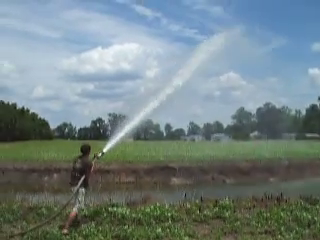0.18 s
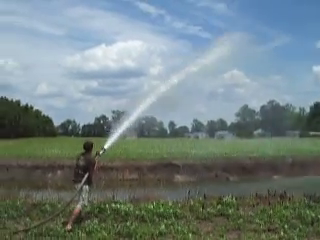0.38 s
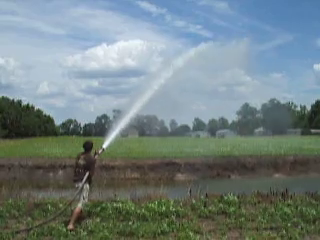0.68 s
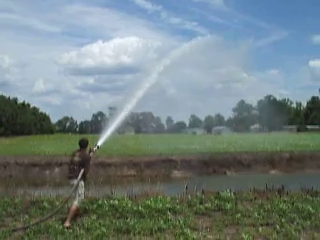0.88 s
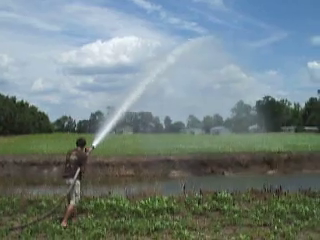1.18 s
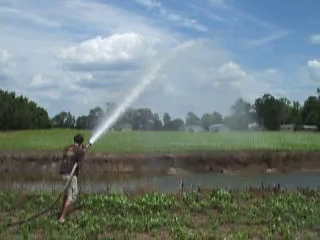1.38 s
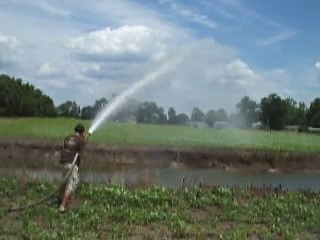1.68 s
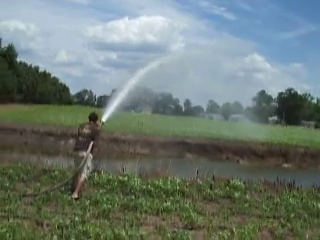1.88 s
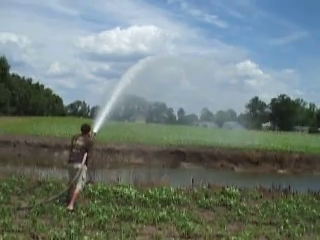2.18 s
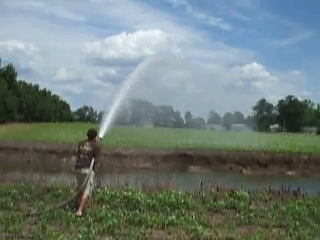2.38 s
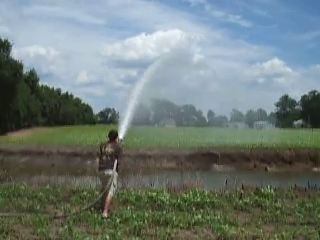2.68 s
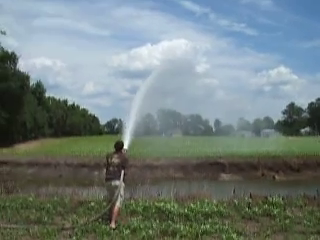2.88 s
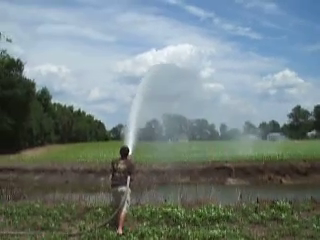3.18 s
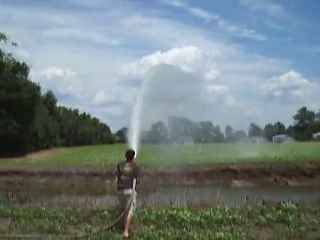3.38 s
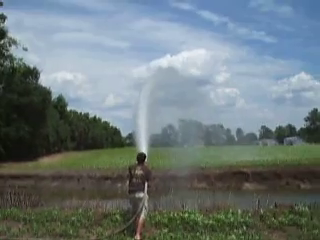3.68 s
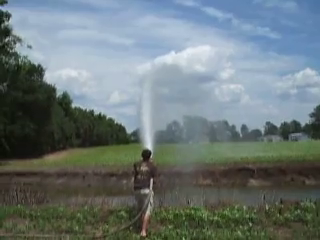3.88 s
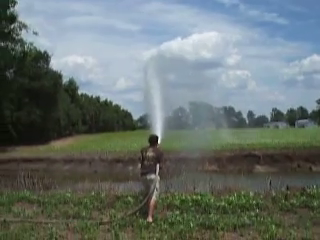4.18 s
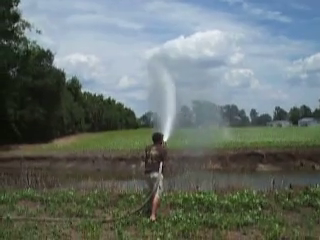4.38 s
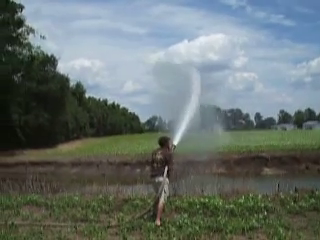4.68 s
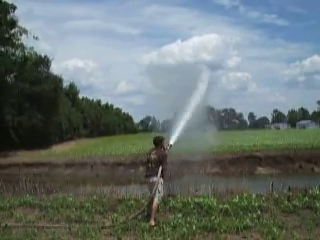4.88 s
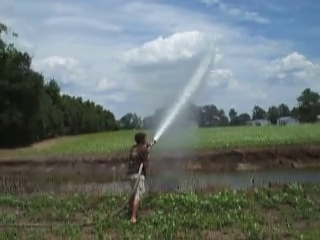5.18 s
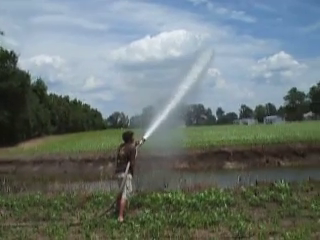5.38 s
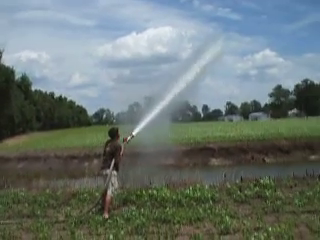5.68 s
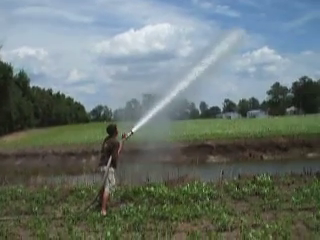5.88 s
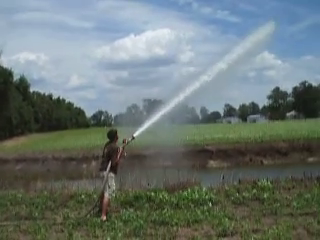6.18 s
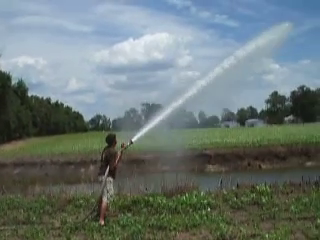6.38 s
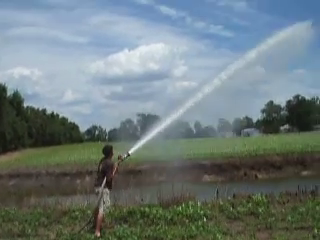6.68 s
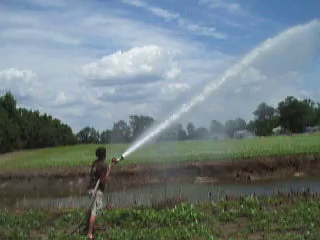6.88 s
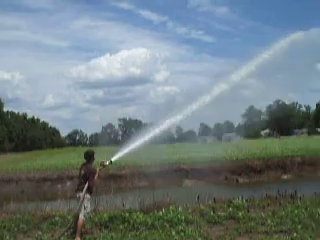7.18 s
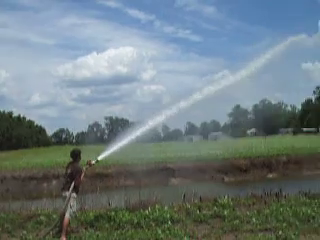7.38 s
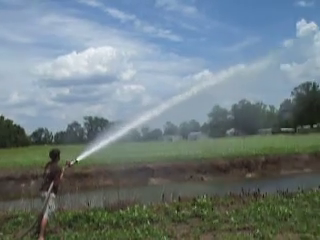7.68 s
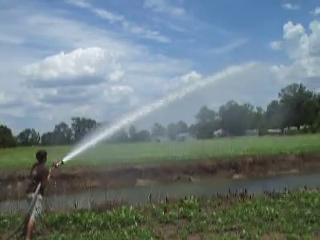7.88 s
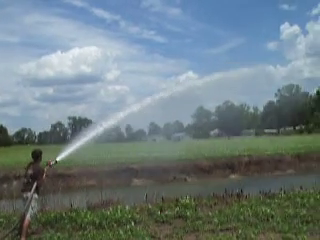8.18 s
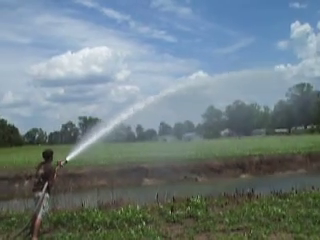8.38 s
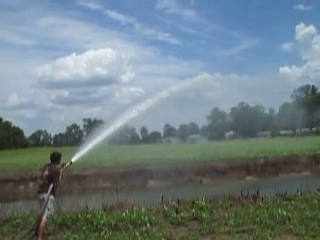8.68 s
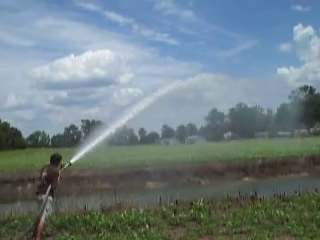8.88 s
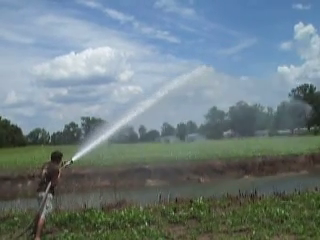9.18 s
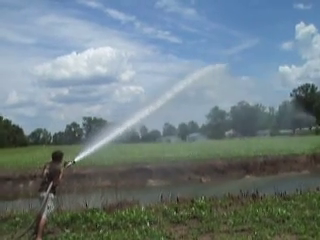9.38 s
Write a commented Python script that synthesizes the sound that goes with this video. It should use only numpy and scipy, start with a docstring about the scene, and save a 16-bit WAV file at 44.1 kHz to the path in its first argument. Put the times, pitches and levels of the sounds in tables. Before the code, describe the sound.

Steady truck engine and pump running hard outdoors, with hissing water spray from a hose and a few low wind thumps.

```python
"""A fire engine's V8 runs at pumping speed, about 2800 rpm, at the edge of an open field.
Its periodic exhaust pulses drone as a harmonic series, its firings clatter over the fan's rush,
and its pump drive whines. A hose nozzle throws a turbulent, hissing jet over a pond.
Eddies of a breeze buffet the small microphone, mostly in the first seconds."""
import sys
import numpy as np
from scipy import signal
from scipy.fft import rfft, irfft, next_fast_len
from scipy.io import wavfile

SR = 44100
rng = np.random.default_rng(int(sys.argv[2]) if len(sys.argv) > 2 else 0)


def unload_audio(sound):
    """Save the sound as a 16-bit wav file, at the path given as the first command line argument."""
    columns = np.transpose(np.atleast_2d(sound))
    # keep every value between -1 and 1, then stretch to whole-number steps
    steps = np.round(np.clip(columns, -1, 1) * 32767)
    wavfile.write(sys.argv[1], SR, steps.astype(np.int16))


N = 422037

# crankshaft speed: (time [s], speed [rpm])
ENGINE_SPEED = [(0, 2794), (1, 2806), (2, 2809), (3, 2815), (4.5, 2811), (5.2, 2820), (7, 2827), (8, 2824),
                (8.6, 2835), (9.57, 2837)]
# strength of each cylinder's beat, in firing order: (level [dB])
FIRING_LEVELS = [1, -0.27, 2.026, 0.13, -1, -1.97, 1.98, 1.5]
# exhaust and pump harmonics: (order [multiple of the four-stroke cycle rate], relative level [dB])
EXHAUST_HARMONICS = [(3, -47.5), (4, -48), (5, -31), (6, -38.5), (7, -41), (8, -33.5), (9, -41), (10, -44),
                     (12, -28.5), (13, -42), (14, -34), (15, -42), (16, -37.5), (17, -44.5), (18, -37),
                     (20, -44.5), (22, -35), (23, -47.5), (25, -48.5), (26, -42.5), (27, -41.5),
                     (28, -38.5), (29, -42), (30, -42.5), (31, -49.5), (32, -34.5), (34, -55), (36, -38),
                     (38, -45.5), (40, -44), (41, -44), (42, -52.5), (47, -55), (48, -43)]
PUMP_HARMONICS = [(68, -54), (74, -44.5), (78, -44), (90, -38.5), (92, -47.5), (94, -44)]
# the engine's sound as the microphone turns: (time [s], level [dB], hollow band gain [dB])
ENGINE_PICKUP = [(0, -0.5, 0.5), (1.7, -1.5, -1.5), (2.45, -0.9, -2), (2.75, 0.7, 0), (3.25, 1.2, 3),
                 (3.6, 0.3, -2.5), (4.35, 0.6, 3), (4.9, -0.9, 0), (5.5, -1.4, 2), (6.2, 0.5, -0.4),
                 (7.1, -0.8, -1.5), (8.3, -0.2, -2), (8.8, 0.9, -1.5), (9.57, -0.2, -3.2)]
# hollow-sounding bands of the engine: (centre frequency [Hz])
HOLLOW_BANDS = [790, 2190]
# spectra of the four noises: (frequency [Hz], relative spectral density [dB])
CLATTER_SPECTRUM = [(30, -24.5), (60, -13.5), (120, -16), (240, -5.5), (420, -2.5), (560, -2.5),
                    (720, -1.5), (860, -3), (1000, -3.5), (1130, -3), (1400, -8.5), (1950, -9.5),
                    (2190, -9.5), (2500, -13), (3000, -23.5), (8000, -63)]
RUSH_SPECTRUM = [(300, -13.5), (900, -5.5), (1400, 0), (1750, 3.5), (2000, -0.5), (2350, 0.5), (3000, -1),
                 (4000, -6.5), (8000, -51)]
HISS_SPECTRUM = [(1500, -12), (3000, 0.5), (4000, 1), (5000, 2), (6500, 1.5), (7200, -4), (8000, -12),
                 (9000, -35.5)]
WIND_SPECTRUM = [(20, -9.5), (40, 0.5), (70, 4.5), (130, 0.5), (220, -1.5), (350, -18), (700, -58)]
# rush of the stream as the nozzle is swung round: (time [s], level [dB])
STREAM_LEVEL = [(0, -30.5), (0.9, -29.5), (1.55, -28), (2.1, -29.5), (3.2, -29.5), (4.1, -30), (5.3, -26.6),
                (6.0, -28), (9.57, -27.5)]
# flares of spray as the jet is jerked: (start [s], duration [s], rise of the hiss [dB])
SPRAY_FLARES = [(1.6, 0.13, 2), (2.55, 0.31, 2), (2.9, 1.73, 1.3), (4.58, 0.48, 2.5), (5.3, 0.26, 0.5),
                (5.67, 0.18, 2), (6.2, 0.16, 1.5), (6.55, 0.2, 1.5), (7.05, 0.21, 2)]
# the breeze between gusts, dying down: (time [s], level [dB])
BREEZE_LEVEL = [(0, -33.5), (2.5, -38), (3.4, -49), (9.57, -47)]
# gusts on the microphone: (start [s], duration [s], level [dB])
WIND_GUSTS = [(0, 0.26, -30), (0.61, 0.41, -29), (1.38, 0.05, -27), (1.6, 0.2, -28), (1.96, 0.47, -30),
              (2.45, 0.073, -23.5), (3.87, 0.14, -40), (4.14, 0.48, -38), (5.14, 0.17, -38),
              (5.52, 0.15, -39), (6.86, 0.079, -34), (8.25, 0.14, -39)]
# single strong eddies: (time [s], crest level [dB], half duration [s], centre frequency [Hz])
WIND_BUFFETS = [(0.073, -24, 0.0092, 148), (0.119, -25, 0.012, 200), (0.171, -17, 0.0066, 135),
                (0.493, -13, 0.004, 210), (0.704, -28, 0.15, 193), (0.995, -22, 0.02, 170),
                (1.641, -28, 0.028, 200), (1.709, -23, 0.015, 170), (2.058, -22.5, 0.041, 180),
                (2.277, -22, 0.018, 170), (2.336, -21, 0.035, 226), (2.472, -23, 0.0095, 151),
                (3.89, -30, 0.011, 130)]
# brief dips in everything but the buffets: (time [s], depth [dB])
LEVEL_DIPS = [(0.175, 2.5), (1.0, 1.5), (7.24, 1.5)]


def exhaust(cycles, engine_db):
    """Periodicity: uneven pulses from two cylinder banks fill in the harmonics of the cycle rate."""
    drone = harmonics(cycles, EXHAUST_HARMONICS, fade_hz=0.7, shake=0.07, smear_rad=1.16)
    return from_db(0.67 + 1.4 * engine_db) * drone


def clatter(cycles, engine_db, decay_firings=0.31, fan_share=0.76, level_db=-25.8):
    """Amplitude modulation: each of eight firings adds a noise burst to the fan's even rush."""
    firing, since_firing = np.divmod(8 * cycles, 1)
    strength = from_db(FIRING_LEVELS)[firing.astype(int) % 8]
    beats = unit_rms(strength * np.exp(-since_firing / decay_firings))
    envelope = np.sqrt(fan_share + (1 - fan_share) * beats ** 2)
    return from_db(level_db + engine_db) * shaped_noise(CLATTER_SPECTRUM, envelope)


def pump(cycles):
    """Synchronous rotation: gears and impeller, locked to the crankshaft, whine at high orders."""
    return harmonics(cycles, PUMP_HARMONICS, fade_hz=0.49, shake=0.09, smear_rad=2.96)


def harmonics(cycles, orders, fade_hz, shake, smear_rad, fade_db=1.0):
    """Fourier synthesis: a sound in step with the firings is a sum of multiples of the cycle rate."""
    out, top_order = np.zeros(N), orders[-1][0]
    firing_spectrum = np.fft.fft(from_db(FIRING_LEVELS))
    for order, db in orders:
        # pipes and panels smear the pulses
        phase = np.angle(firing_spectrum[order % 8]) + smear_rad * rng.standard_normal()
        air_db = fade_db * order / top_order * drift(fade_hz)  # high harmonics fade most deeply
        tremor = 1 + shake * drift(14)  # uneven combustion
        out += from_db(db + air_db) * tremor * np.cos(2 * np.pi * order * cycles + phase)
    return out


def hollow(sound, gain_db, width_hz):
    """Coloration: two bands of the engine's sound swell and sink together as the microphone turns."""
    bands = sum(signal.lfilter(*signal.iirpeak(hz, hz / width_hz, fs=SR), sound) for hz in HOLLOW_BANDS)
    return sound + (from_db(gain_db) - 1) * bands


def water_jet(flutter_db=0.42):
    """Turbulence: the stream rushes from the nozzle and tears into spray, the two fluttering as one."""
    stream_db, = curves(STREAM_LEVEL)
    flare_db = plateaus(SPRAY_FLARES, edge_s=0.13)
    rush_db = stream_db + 0.15 * flare_db
    hiss_db = -32 + 0.3 * (stream_db - stream_db.mean()) + flare_db
    turbulence_db = flutter_db * drift(32)
    rush = from_db(rush_db + turbulence_db) * shaped_noise(RUSH_SPECTRUM)
    hiss = from_db(hiss_db + turbulence_db) * shaped_noise(HISS_SPECTRUM)
    return rush + hiss


def wind(lumps_db=2.0):
    """Pressure fluctuation: eddies rumble at the microphone port; breeze and gusts add in power."""
    breeze_db, = curves(BREEZE_LEVEL)
    gusts = plateaus([(start, length, from_db(db)) for start, length, db in WIND_GUSTS], edge_s=0.063)
    lumps = from_db(lumps_db * drift(19))
    return np.hypot(from_db(breeze_db), gusts) * lumps * shaped_noise(WIND_SPECTRUM)


def buffets(edge_ratio=1.57):
    """Pressure transients: the strongest eddies strike as short thumps of low band-limited noise."""
    out, t = np.zeros(N), np.arange(-SR // 4, SR // 4) / SR
    for crest_s, db, half_s, hz in WIND_BUFFETS:
        band = signal.butter(2, [hz / edge_ratio, hz * edge_ratio], "band", fs=SR, output="sos")
        swell = np.exp(-.5 * (t / half_s) ** 2)
        thump = swell * signal.sosfilt(band, rng.standard_normal(len(t)))
        thump *= from_db(db) * np.linalg.norm(swell) / np.linalg.norm(thump)
        out += np.interp(np.arange(N) / SR - crest_s, t, thump, left=0, right=0)
    return out


def dips(fall_s=0.0067, hold_s=0.15, recovery_db_per_s=6):
    """Attenuation: a gain that drops quickly, stays down a moment and recovers at a steady rate."""
    t, loss_db = np.arange(N) / SR, np.zeros(N)
    for start, depth_db in LEVEL_DIPS:
        onset = np.clip((t - start) / fall_s, 0, 1)
        recovered_db = recovery_db_per_s * np.maximum(t - start - hold_s, 0)
        loss_db += onset * np.maximum(depth_db - recovered_db, 0)
    return from_db(-loss_db)


def shaped_noise(spectrum, envelope=1):
    """Source and filter: white noise under an envelope is given a spectrum and scaled to rms 1."""
    excitation = envelope * rng.standard_normal(N)
    size = next_fast_len(N)
    hz, db = np.transpose(spectrum)
    bin_hz = np.maximum(np.fft.rfftfreq(size, 1 / SR), 1)
    response = from_db(np.interp(np.log(bin_hz), np.log(hz), db))
    return unit_rms(irfft(rfft(excitation, size) * response, size)[:N])


def drift(rate_hz):
    """Random modulation: noise low-passed at rate_hz wanders slowly with rms 1."""
    hop, warm_up = 40, 2000
    pole = np.exp(-2 * np.pi * hop * rate_hz / SR)
    noise = rng.standard_normal(N // hop + warm_up + 2)
    slow = signal.lfilter([1], [1, -2 * pole, pole * pole], noise)[warm_up:]
    return np.interp(np.arange(N) / hop, np.arange(len(slow)), unit_rms(slow))


def plateaus(rows, edge_s):
    """Superposed trapezoids: each row (start, length, height) rises, holds and falls."""
    t = np.arange(N) / SR
    return sum(height * np.clip(np.minimum(t - start, start + length - t) / edge_s + .5, 0, 1)
               for start, length, height in rows)


def curves(rows):
    """Linear interpolation: each column after the time, at every sample."""
    times, *columns = np.transpose(rows)
    return [np.interp(np.arange(N) / SR, times, column) for column in columns]


def from_db(db):
    """Decibel scale: 20 dB is a factor of ten in amplitude."""
    return 10 ** (np.asarray(db) / 20)


def unit_rms(x):
    """Normalisation to rms 1."""
    return x / np.sqrt(np.mean(x ** 2) + 1e-20)


def scene():
    """Superposition: engine, jet and wind simply add together."""
    rpm, = curves(ENGINE_SPEED)
    engine_db, hollow_db = curves(ENGINE_PICKUP)
    cycle_hz = rpm / 120  # one four-stroke cycle takes two turns
    cycles = np.cumsum(cycle_hz * (1 + 0.00026 * drift(3))) / SR
    drone = hollow(exhaust(cycles, engine_db), 1.3 * hollow_db, width_hz=140)
    roar = hollow(clatter(cycles, engine_db), hollow_db, width_hz=130)
    sustained = drone + roar + pump(cycles) + water_jet() + wind()
    return (dips() * sustained + buffets())[None]


def record(dry, cutoff_hz=9000, dc_offset=-0.0704):
    """Band limiting: a small camera cuts the top treble, and its signal rests a little below zero."""
    low_pass = signal.ellip(12, .1, 90, cutoff_hz, fs=SR, output="sos")
    return signal.sosfilt(low_pass, dry) + dc_offset


dry = scene()
out = record(dry)
unload_audio(out)
```